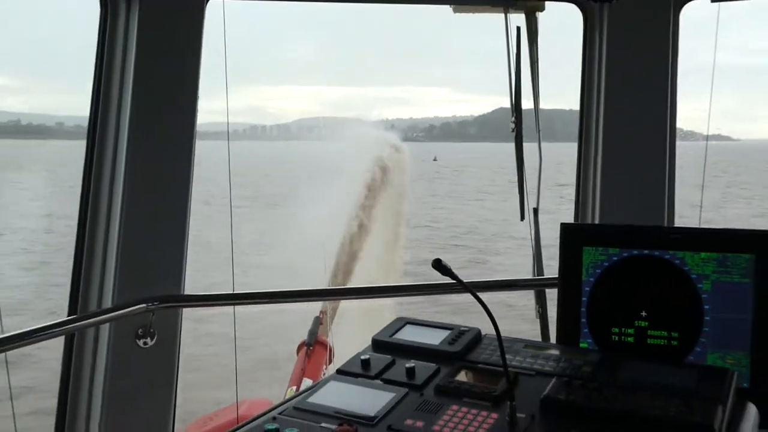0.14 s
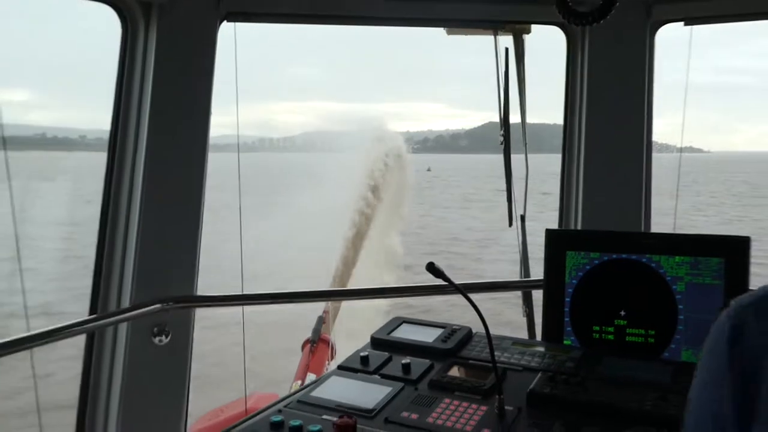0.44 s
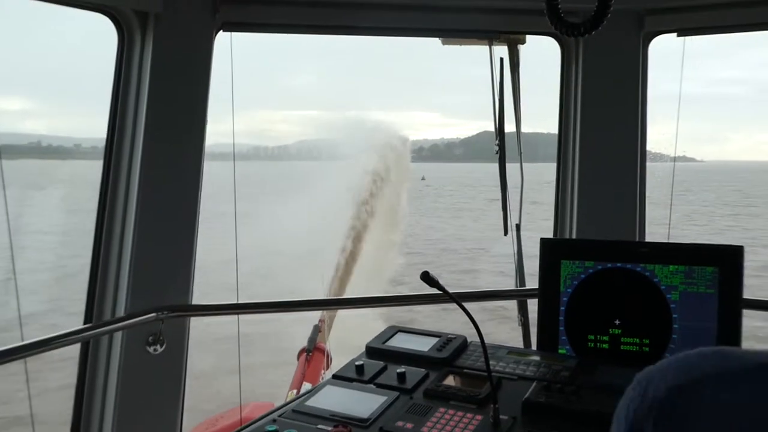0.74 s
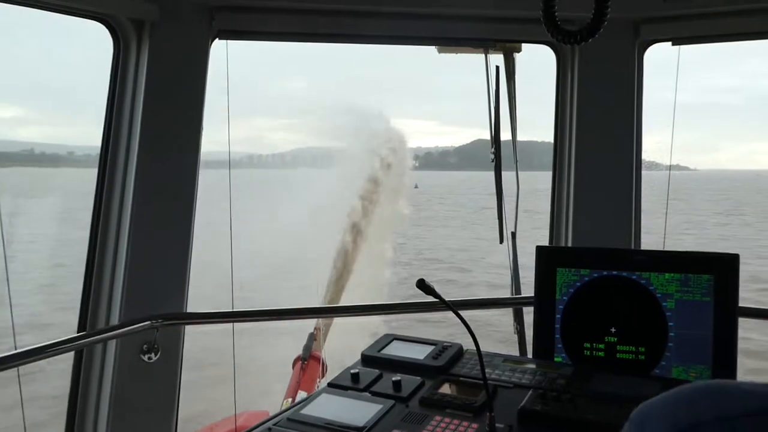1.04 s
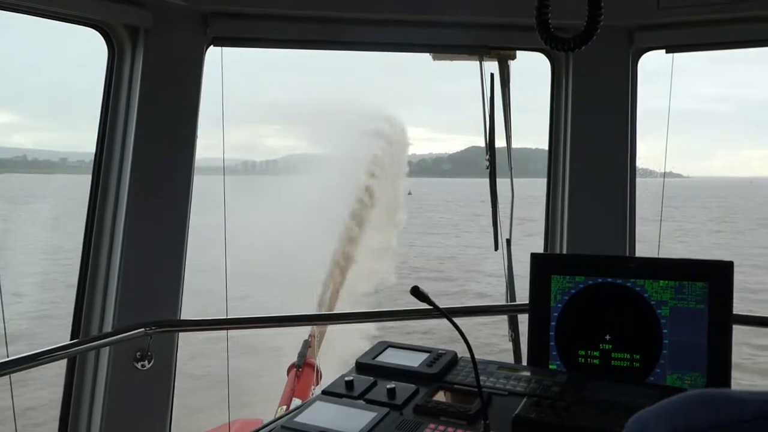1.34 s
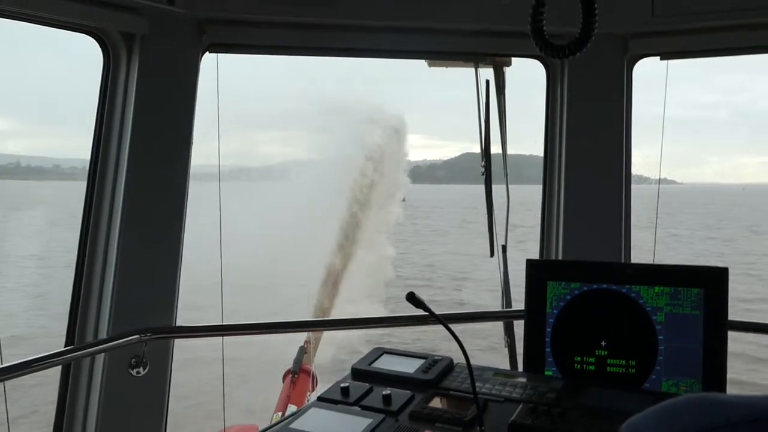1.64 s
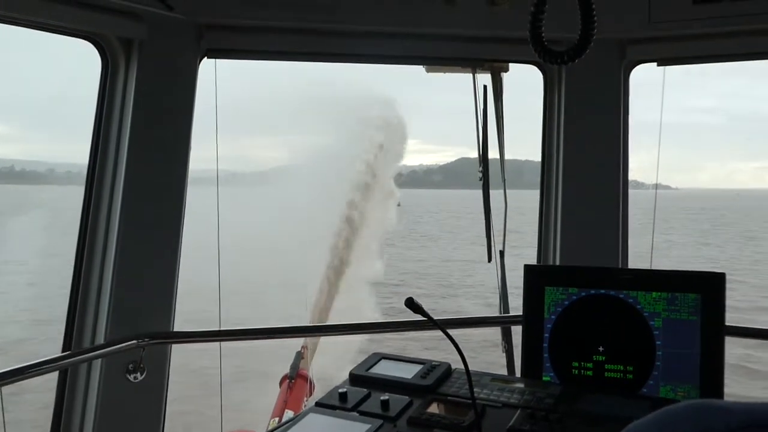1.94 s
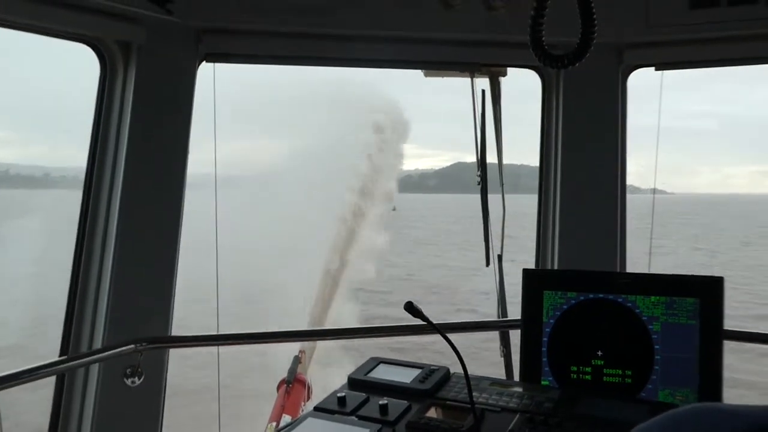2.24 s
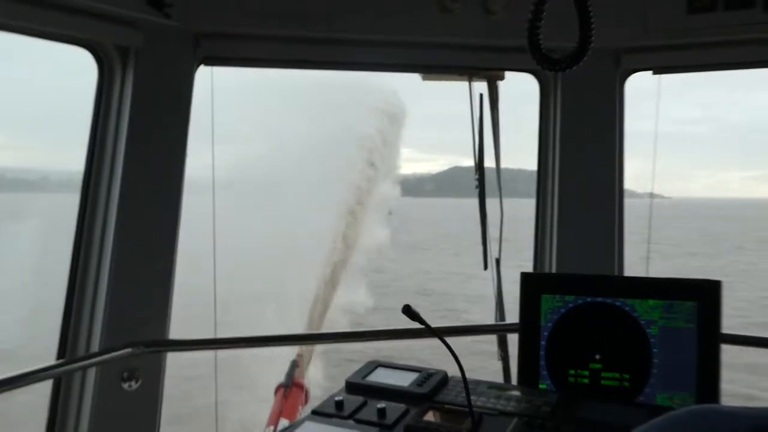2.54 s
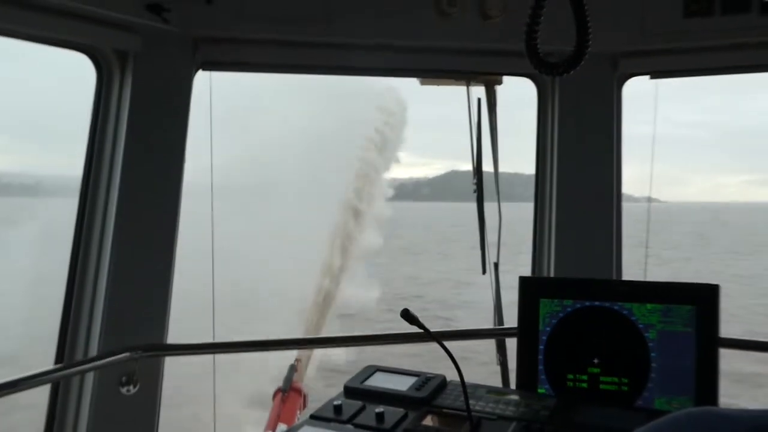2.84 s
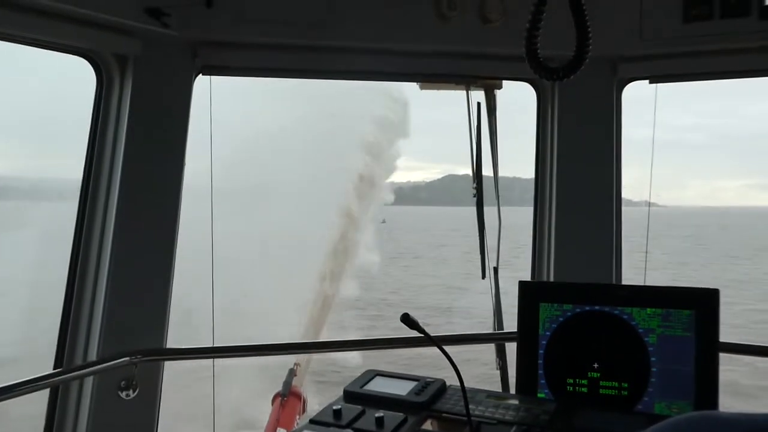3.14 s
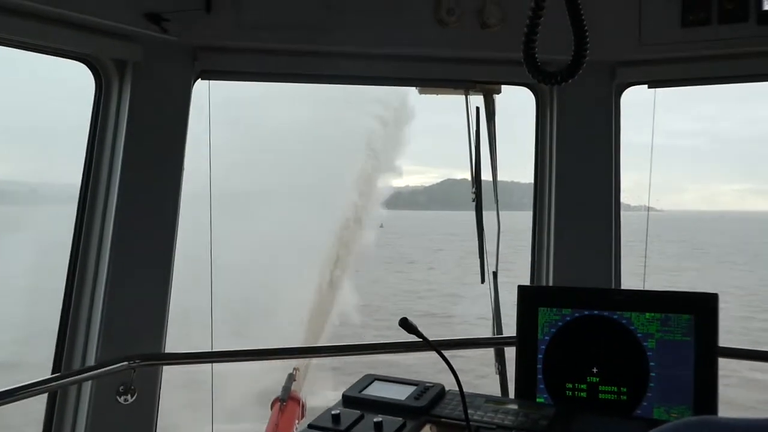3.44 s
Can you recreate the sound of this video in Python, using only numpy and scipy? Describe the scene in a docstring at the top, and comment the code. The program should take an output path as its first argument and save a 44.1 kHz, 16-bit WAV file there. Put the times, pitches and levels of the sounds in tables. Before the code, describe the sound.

Boat engine and pump drone throughout, low, throbbing and humming, heard inside a small wheelhouse. A tiny sharp tick at 0.1 s, a brief cloth brush at 0.2 s and barely audible thin squeaks around 0.4 s and 2.4 s. The water jet is faint at first, surges from about 0.7 s, and peaks near 2.7 s with hollow pipe resonance, roar and pattering spray hiss, continuing to the end at 3.6 s.

```python
"""A diesel and its fire pump drone through a boat's hull, heard in the wheelhouse, while a water cannon opens.
The engine is a harmonic series; pump hum is wavering sine lines; pump rush and hull rumble are shaped noise.
The flow drives pipe and cabin resonances and a broad roar; spray is bright noise with a patter of drops.
Close by are a tick of decaying modes, brushes of cloth as noise bursts and faint gliding sine squeaks.
A steady faint hiss lies beneath."""
import sys
import numpy as np
from scipy import signal
from scipy.fft import rfft, irfft
from scipy.io import wavfile
from scipy.ndimage import uniform_filter1d

SR = 44100
rng = np.random.default_rng(int(sys.argv[2]) if len(sys.argv) > 2 else 0)


def transcribe(signal):
    """Save signal, clipped to [-1, 1], as a 16-bit WAV file at the path in sys.argv[1]."""
    frames = np.atleast_2d(signal).T
    limited = np.clip(frames, -1, 1)
    pcm = np.round(limited * 32767).astype(np.int16)
    wavfile.write(sys.argv[1], SR, pcm)


N = 157878  # samples in the scene

# Spectra give relative level_db per Hz; resonance widths lie between points about 4 dB down.
# Engine orders: multiple of the cycle rate, then five level_db at even steps from start to end
ENGINE_ORDERS = [(5, -46, -40, -36.5, -39, -35.5), (6, -32.5, -30.5, -40.5, -38, -33),
                 (9, -32.5, -31, -37, -37, -39.5), (10, -37, -43, -52, -52, -41),
                 (11, -35, -35.5, -48, -45, -28), (12, -30.5, -31.5, -34.5, -34.5, -33),
                 (13, -31, -48, -37.5, -39, -57)]
CYCLE_HZ, SPEED_WANDER = 14.89, 0.0021  # four-stroke cycles per second; rms share of speed wander
# Hum of the pump and other machinery: pitch_hz, level_db at start, middle and end
HUM_LINES = [(96.7, -41.5, -33, -50), (108.5, -58, -43, -41), (117.2, -58, -51, -31.5),
             (202.4, -45, -43.5, -35), (233.2, -38, -42, -42), (507.6, -73, -43, -41.5),
             (528.7, -44, -41.5, -36.5), (570, -47, -44, -39.5), (587, -37.5, -35, -47),
             (624, -56, -41, -48), (827.5, -61, -44.5, -40.5), (1060, -54.5, -49, -52),
             (1204, -70, -51.5, -64), (1930, -66, -64, -66)]
HUM_JITTER_HZ, HUM_WIDTH_DB = 1.336, -20.5  # rms pitch wander; side level relative to mid
WAVER_DB, WAVER_PER_S = 2.2, 2.96  # rms depth and rate of level wander in every line
# Notes that swell out of the drone and sink back: middle_s, length_s (between 1/e points), pitch_hz, level_db
SWELLING_NOTES = [(0.52, 0.41, 260, -29), (0.92, 0.32, 259, -27), (0.91, 0.49, 291, -29),
                  (2.08, .3, 175, -33), (3.06, 0.16, 263, -28)]
# Steady rush of the pump: centre_hz, width_hz (its resonance is applied twice, so about 8 dB down), level_db
PUMP_BANDS = [(700, 210, -41), (1340, 400, -47), (1790, 260, -52), (2033, 270, -56.5)]
# Hull rumble spectrum: frequency_hz, level_db
HULL_SPECTRUM = [(20, -58), (40, -45), (52, -13.5), (64, -17), (76, -9.5), (100, -3), (125, -5.5),
                 (180, -3), (230, -3), (290, -6.5), (360, -9.5), (420, -8.5), (600, -9.5), (790, -15),
                 (1000, -22.5), (1350, -24.5), (1600, -32.5), (2100, -40), (2320, -57), (5000, -78)]
HULL_START_DB, HULL_FALL_DB_PER_S = -25.5, 1.34
# Gain of the deep bass: time_s, gain_db
BASS_THROB = [(0, -6), (.12, -5), (.22, 1.5), (.36, -3.5), (.46, 4.5), (.55, -2), (.64, 4.5), (.73, 0.5),
              (.82, 1.5), (1.0, -5.5), (1.4, 1.5), (1.54, 2), (1.76, -2.5), (2.1, 1.5), (2.5, 0.5),
              (2.65, -6), (2.77, 2), (2.86, -3.5), (3.0, 7), (3.18, -5), (3.5, 0)]
THROB_TOP_HZ = 115

# Strength of the jet: time_s, level_db
JET_STRENGTH = [(0, -23), (.55, -18), (.63, -27), (.69, -13.5), (.79, -10), (1.05, -6.5), (1.45, -4.5),
                (1.85, -5), (2.25, -1.5), (2.66, 0), (2.85, -1.4), (3.25, -0.5), (3.58, -1.5)]
# Main pipework resonance, wandering centre: time_s, centre_hz
PIPE_CENTRE = [(0, 590), (0.449, 545), (.8, 580), (1.2, 590), (1.65, 525), (1.899, 555), (2.25, 585),
               (2.42, 545), (2.65, 570), (2.85, 535), (3.4, 555)]
# Main pipework resonance, level: time_s, level_db
PIPE_LEVEL = [(0, -34), (.23, -31.5), (.4, -44), (.65, -33.5), (1.0, -36), (1.15, -28), (1.32, -34),
              (1.45, -27.5), (1.72, -31), (1.88, -28.5), (2.1, -32.5), (2.25, -27.5), (2.5, -32.5),
              (2.63, -25), (2.8, -30), (2.95, -30), (3.2, -29.5), (3.58, -41.5)]
# Lesser resonances of pipework and cabin: centre_hz, width_hz, relative level_db
LESSER_RESONANCES = [(405, 60, -4.5), (497, 41, -2.5), (757, 65, -11), (807, 54, -6.5), (1142, 89, -12.5)]
PIPE_WIDTH_HZ, LESSER_DB = 74, -4.5  # lesser resonances together, relative to the main one
# Boom of the cabin panels, wandering centre: time_s, centre_hz
BOOM_CENTRE = [(0, 295), (0.501, 330), (0.899, 325), (1.1, 305), (1.3, 325.5), (1.52, 295), (1.64, 244.5),
               (1.8, 300), (2.1, 320), (2.6, 265)]
# Boom of the cabin panels, level: time_s, level_db
BOOM_LEVEL = [(0, -27.5), (.6, -30.5), (.95, -33), (1.2, -25), (1.43, -31), (1.62, -26.5), (1.9, -31.5),
              (2.6, -30.5), (2.9, -36), (3.58, -48)]
BOOM_WIDTH_HZ = 79
# Roar of the jet, spectrum: frequency_hz, level_db
ROAR_SPECTRUM = [(40, -45), (70, -27), (100, 2), (250, 1), (400, -4), (650, -5), (850, -6), (1000, -13),
                 (1300, -18.5), (1600, -27), (2050, -30), (2450, -35), (6000, -82)]
ROAR_DB, ROAR_IDLE = -27, 0.26  # level at full jet; share of the amplitude that needs no jet
SURGE_DB, SURGE_PER_S = 2.0, 23  # rms depth and rate of the roar's level wander
CREST_HZ, CREST_WIDTH_HZ, CREST_END_DB, CREST_DB_PER_S = 1090, 230, -35, 14

# Hiss of spray through the glass, spectrum: frequency_hz, level_db
SPRAY_SPECTRUM = [(400, -9), (1200, 2.5), (2000, 1.5), (2600, -2.5), (3200, -6.5), (5000, -10.5),
                  (6600, -19), (8200, -29), (10300, -28), (12000, -48), (15000, -48)]
SPRAY_DB, DROPS_PER_S, DROP_SHARE = -39.5, 2700, 0.24  # drop rate at full jet; drop amplitude beside hiss
# Fine mist, spectrum: frequency_hz, level_db
MIST_SPECTRUM = [(2000, -2.5), (5000, 1), (6800, 5.5), (8200, 1), (10300, 0), (12000, -8), (15000, -16)]
MIST_DB, MIST_POWER = -53, 3  # level at full jet; mist amplitude follows jet amplitude to this power

# Modes of the tick: pitch_hz, level_db (peak), t60_s
SNAP_MODES = [(5840, -32, 0.0044), (8300, -32, .0028), (10300, -24.5, 0.0026), (14800, -39, .002)]
TICK_S, TICK_LOW_HZ = .0827, 4000  # so small a part radiates little below this
SCATTER_DB, SCATTER_HZ, SCATTER_WIDTH_HZ, SCATTER_DECAY_S = -42, 5200, 6000, 0.0022
# Cloth brushing nearby: start_s, attack_s, hold_s, release_s, centre_hz, width_hz, level_db
CLOTH_BRUSHES = [(.202, 0.008, .002, 0.0094, 4200, 3200, -49.5), (0.937, .04, 0.48, .12, 10700, 4500, -65)]
# Thin squeaks: start_s, length_s, four pitch_hz at even steps, level_db (peak)
SQUEAK_GLIDES = [(.35, .12, 10400, 10600, 10900, 11500, -71), (.45, .14, 11600, 11850, 12150, 12200, -66),
                 (.41, .22, 12350, 12850, 13400, 12800, -70), (2.38, .3, 13200, 12150, 12250, 11800, -70)]
SQUEAK_ROUGH_DB = 3.5  # rms depth of the level flutter

# Steady faint hiss, spectrum: frequency_hz, level_db
AIR_SPECTRUM = [(1000, 3.5), (3000, -1), (5500, 1), (6800, -2), (8000, -8.5), (10500, -7), (12500, -17),
                (15000, -21)]
AIR_DB = -57
# Stereo spread of noise: frequency_hz, side_minus_mid_db
STEREO_WIDTH = [(30, -11), (70, -4.5), (250, -16), (550, -13.5), (1100, -10.5), (4000, -9.5), (9000, -7),
                (14000, -2)]
RIPPLE_DB, RIPPLE_HZ = 2.5, 13.4  # rms depth and smoothing width of the cabin's spectral peaks and dips
LEAN_DB = -1.5  # left minus right
TOP_HZ = 15500


def engine(t):
    """Harmonic series: periodic firing excites multiples of one slowly wandering cycle rate."""
    speed = CYCLE_HZ * (1 + SPEED_WANDER * walk(0.67))
    return sum(drift(t, levels) * tone(order * speed) for order, *levels in ENGINE_ORDERS)


def machine_hum(t):
    """Narrow-band tones: rotating machinery radiates lines of slightly unsteady pitch."""
    return sum(drift(t, levels) * tone(hz + HUM_JITTER_HZ * walk(5.5)) for hz, *levels in HUM_LINES)


def swelling_notes(t):
    """Amplitude modulation: each tone rises and sinks under a smooth, flat-topped envelope."""
    out = 0
    for middle, length, hz, db in SWELLING_NOTES:
        envelope = np.exp(-(2 * (t - middle) / length) ** 4)
        out = out + undb(db) * envelope * tone(hz + HUM_JITTER_HZ * walk(6))
    return out


def pump_rush():
    """Resonant filtering: steady turbulence in the pump is concentrated into bands."""
    return sum(undb(db) * rush(resonance(hz, width) ** 2) for hz, width, db in PUMP_BANDS)


def hull_rumble(t):
    """Structure-borne noise: the hull passes chiefly low frequencies, here slowly weakening."""
    return rush(colour(HULL_SPECTRUM)) * undb(HULL_START_DB - HULL_FALL_DB_PER_S * t)


def machinery(t):
    """Superposition: tones beat over broadband rumble, and the deep bass throbs unevenly."""
    drone = engine(t) + machine_hum(t) + pump_rush() + hull_rumble(t)
    bass = irfft(rfft(drone) / (1 + (freqs() / THROB_TOP_HZ) ** 20), N)
    throb = bass * (curve(t, BASS_THROB) - 1)  # changes only the bass already in the drone
    return drone + swelling_notes(t) + throb


def pipework(t):
    """Flow-excited resonance: turbulence drives one wandering pipe mode and several lesser ones."""
    main = gliding_rush(t, PIPE_CENTRE, PIPE_WIDTH_HZ)
    lesser = rush(sum(undb(db) * resonance(hz, width) for hz, width, db in LESSER_RESONANCES))
    return (main + lesser * undb(LESSER_DB)) * curve(t, PIPE_LEVEL) * undb(0.77 * walk(12))


def cabin_boom(t):
    """Panel resonance: the flow shakes the cabin panels in one low, wandering band."""
    return gliding_rush(t, BOOM_CENTRE, BOOM_WIDTH_HZ) * curve(t, BOOM_LEVEL)


def jet_roar(t, jet):
    """Turbulent jet noise: a broad roar follows jet strength, and a higher rush grows to the end."""
    strength = ROAR_IDLE + (1 - ROAR_IDLE) * jet
    roar = rush(colour(ROAR_SPECTRUM)) * undb(ROAR_DB + SURGE_DB * walk(SURGE_PER_S)) * strength
    crest_gain = undb(CREST_END_DB + CREST_DB_PER_S * (t - t[-1]))
    return roar + rush(resonance(CREST_HZ, CREST_WIDTH_HZ)) * crest_gain


def spray(jet):
    """Jet break-up: hiss, random drop impulses and fine mist, the mist growing fastest with the jet."""
    landings = rng.random((2, N)) < DROPS_PER_S * jet / SR
    drops = cabin(landings * rng.standard_normal((2, N)), colour(SPRAY_SPECTRUM))
    hiss = rush(colour(SPRAY_SPECTRUM)) * undb(0.64 * walk(14))
    mist = rush(colour(MIST_SPECTRUM)) * undb(MIST_DB + 0.57 * walk(10)) * jet ** MIST_POWER
    return undb(SPRAY_DB) * (jet * hiss + DROP_SHARE * np.sqrt(jet) * drops) + mist


def tick(t):
    """Modal decay: a snapped hard part rings in very short modes, with brief scatter from the cabin."""
    age = np.maximum(t - TICK_S, 0)
    ring = 0
    for hz, db, t60 in SNAP_MODES:
        ring = ring + undb(db) * np.sin(2 * np.pi * hz * age) * np.exp(-np.log(1000) * age / t60)
    radiated = irfft(rfft(ring) / (1 + (TICK_LOW_HZ / freqs()) ** 6), N)
    scatter = rush(resonance(SCATTER_HZ, SCATTER_WIDTH_HZ)) * (age > 0) * np.exp(-age / SCATTER_DECAY_S)
    return radiated + undb(SCATTER_DB) * scatter


def cloth_brushes(t):
    """Friction noise: rubbing cloth gives bands of noise that rise, hold and fall."""
    out = 0
    for start, attack, hold, release, hz, width, db in CLOTH_BRUSHES:
        swell = np.interp(t, start + np.cumsum([0, attack, hold, release]), [0, 1, 1, 0])
        out = out + undb(db) * swell * rush(resonance(hz, width))
    return out


def squeaks(t):
    """Frequency modulation: thin tones glide in pitch, roughened by fast pitch and level flutter."""
    out = 0
    for start, length, *glide, db in SQUEAK_GLIDES:
        progress = np.clip((t - start) / length, 0, 1)
        pitch = np.interp(progress, np.linspace(0, 1, len(glide)), glide) + 90 * walk(280)
        level = undb(db + SQUEAK_ROUGH_DB * walk(90)) * np.sin(np.pi * progress)
        out = out + level * np.sin(2 * np.pi * np.cumsum(pitch) / SR)
    return out


def air_hiss():
    """Stationary noise: a constant, faint hiss of fixed spectrum."""
    return undb(AIR_DB) * rush(colour(AIR_SPECTRUM))


def rush(gain):
    """Filtered turbulence: random noise of a given colour, shaped and spread by the cabin."""
    return cabin(rng.standard_normal((2, N)), gain * ripple())


def gliding_rush(t, centres, width_hz):
    """Frequency shifting: the analytic signal moves a noise band along a wandering centre."""
    hz = np.interp(t, *np.array(centres).T)
    band = signal.hilbert(rush(resonance(hz.mean(), width_hz)))
    return (band * np.exp(2j * np.pi * np.cumsum(hz - hz.mean()) / SR)).real


def tone(hz):
    """Phase accumulation: a wavering sine whose phase differs slightly between the ears."""
    phase = 2 * np.pi * (np.cumsum(hz) / SR + rng.random())
    side = undb(HUM_WIDTH_DB) * np.sin(phase + 2 * np.pi * rng.random())
    pair = np.sin(phase) + side * np.array([[1], [-1]])
    return unit(undb(WAVER_DB * walk(WAVER_PER_S)) * pair)


def cabin(pair, gain):
    """Mid-side decorrelation: two unrelated signals are coloured alike and spread by frequency."""
    mid = irfft(rfft(pair[0]) * gain, N)
    side = irfft(rfft(pair[1]) * gain * colour(STEREO_WIDTH), N)
    return unit(np.array([mid + side, mid - side]))


def ripple():
    """Modal overlap: a small hard room gives irregular peaks and dips, as gain per bin."""
    count = max(int(RIPPLE_HZ * N / SR), 1)
    bumps = uniform_filter1d(uniform_filter1d(rng.standard_normal(N // 2 + 1), count), count)
    return undb(RIPPLE_DB * unit(bumps) * np.minimum(freqs() / 900, 1))  # shallower below 900 Hz


def resonance(hz, width_hz):
    """Damped resonance: gain per bin falls steeply with detuning from the centre."""
    f = freqs()
    detuning = (f / hz - hz / f) * hz / width_hz / 2
    return 1 / (1 + detuning ** 2) ** 2


def colour(points):
    """Spectral envelope: gain per bin, interpolated in dB over log frequency."""
    hz, db = np.array(points).T
    return undb(np.interp(np.log(freqs()), np.log(hz), db))


def freqs():
    """Discrete spectrum: the frequency of each bin in Hz, at least 1."""
    return np.maximum(np.arange(N // 2 + 1) * SR / N, 1)


def walk(rate):
    """Low-passed noise: smooth chance of rms 1 that changes about rate times a second."""
    lowpass = np.exp(-(freqs() / rate) ** 2) * (np.arange(N // 2 + 1) > 0)  # no constant part
    return unit(irfft(rfft(rng.standard_normal(N)) * lowpass, N))


def curve(t, points):
    """Level envelope: gain over time from points of time_s, level_db."""
    return undb(np.interp(t, *np.array(points).T))


def drift(t, levels_db):
    """Slow level envelope: gain through evenly spaced levels from start to end."""
    return undb(np.interp(t, np.linspace(0, t[-1], len(levels_db)), levels_db))


def undb(db):
    """Logarithmic level: decibels to amplitude gain."""
    return 10 ** (np.asarray(db) / 20)


def unit(x):
    """Power normalization: scale to rms 1."""
    return x / np.sqrt(np.mean(x ** 2))


def scene():
    """Intensity panning: machinery, pipework, boom and roar lean right; spray, small sounds, hiss do not."""
    t = np.arange(N) / SR
    jet = curve(t, JET_STRENGTH)
    leaning = machinery(t) + pipework(t) + cabin_boom(t) + jet_roar(t, jet)
    lean = undb(np.array([[LEAN_DB], [-LEAN_DB]]) / 2)
    small_sounds = tick(t) + cloth_brushes(t) + squeaks(t)
    return leaning * lean + spray(jet) + small_sounds + air_hiss()


def record(dry):
    """Band limitation: a steep elliptic low-pass cuts the top of the spectrum."""
    # a mirrored lead-in lets the filter settle before the start
    lead = np.pad(dry, ((0, 0), (512, 0)), mode="reflect", reflect_type="odd")
    lowpass = signal.ellip(8, .2, 70, TOP_HZ, fs=SR, output="sos")
    return signal.sosfilt(lowpass, lead)[:, -N:]


dry = scene()
out = record(dry)
transcribe(out)
```